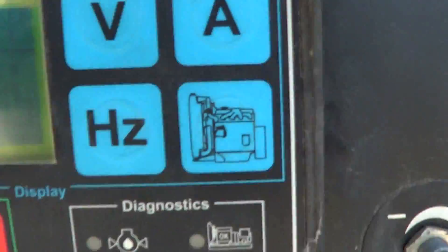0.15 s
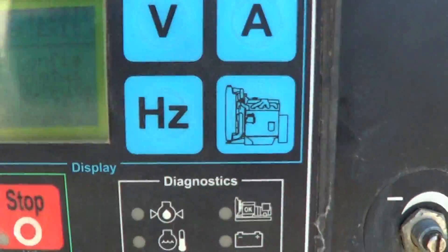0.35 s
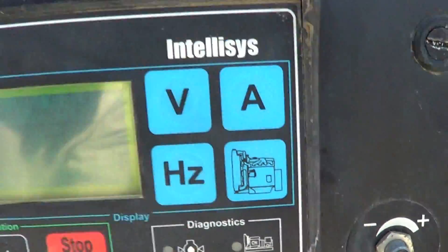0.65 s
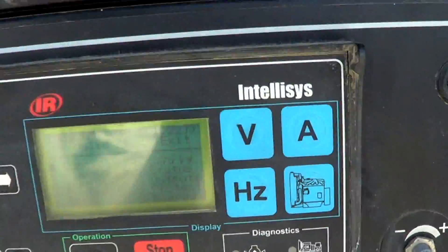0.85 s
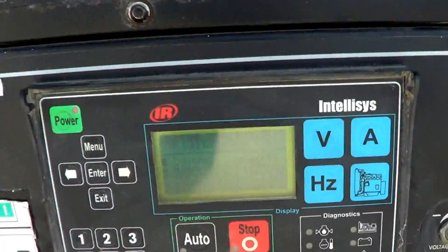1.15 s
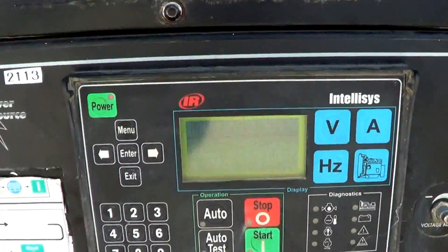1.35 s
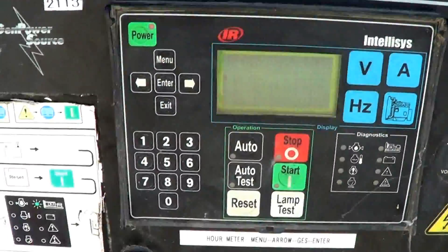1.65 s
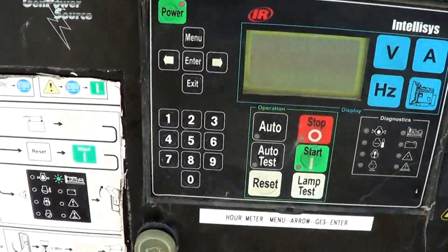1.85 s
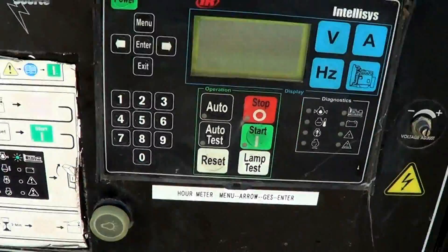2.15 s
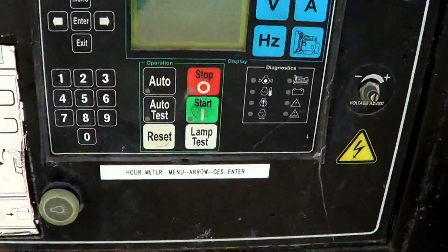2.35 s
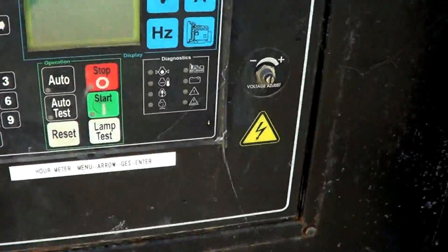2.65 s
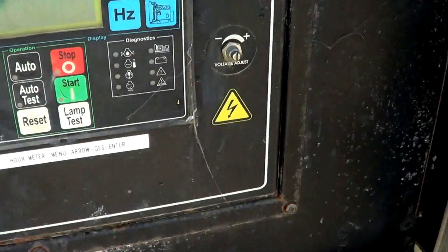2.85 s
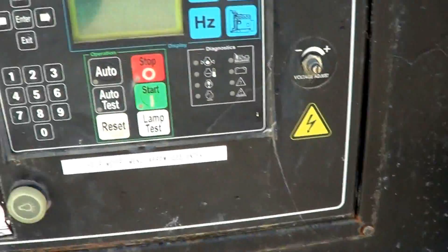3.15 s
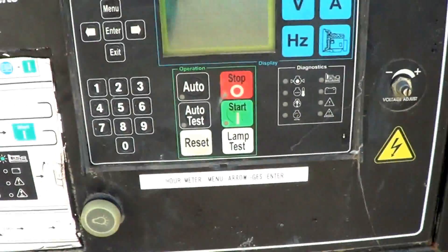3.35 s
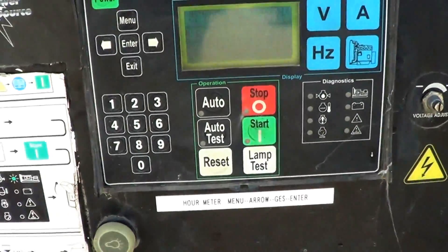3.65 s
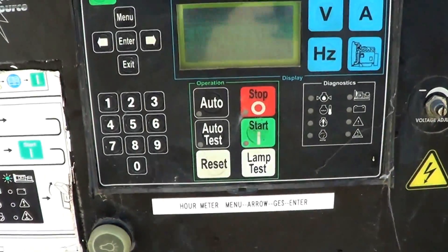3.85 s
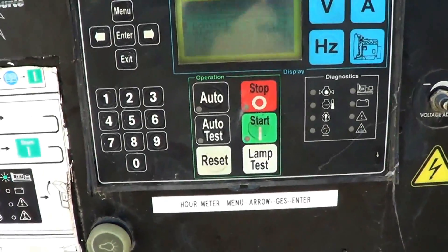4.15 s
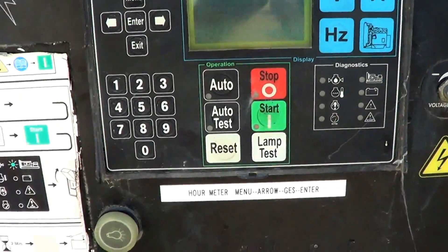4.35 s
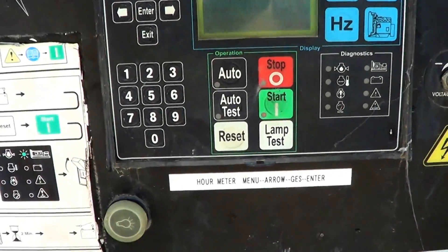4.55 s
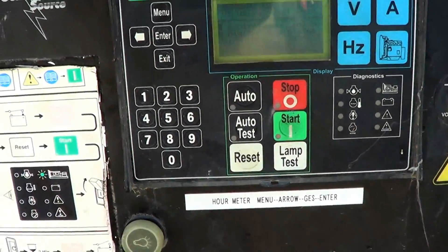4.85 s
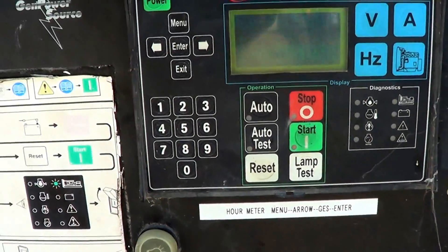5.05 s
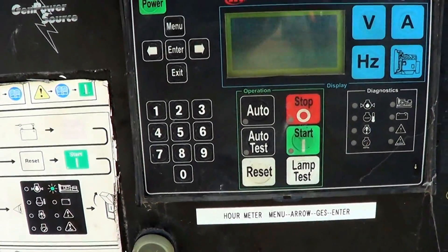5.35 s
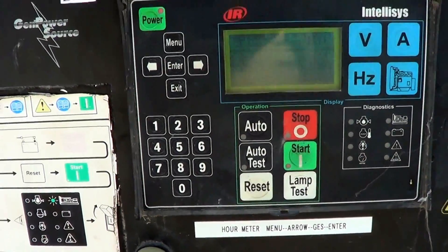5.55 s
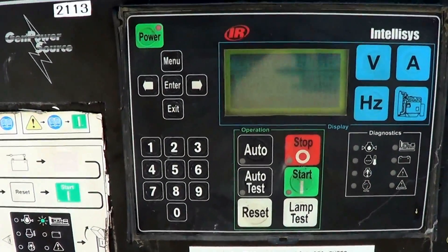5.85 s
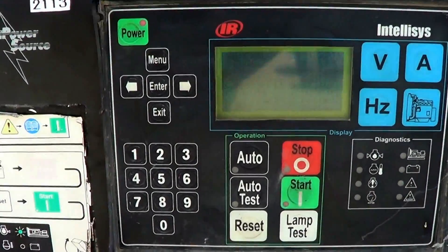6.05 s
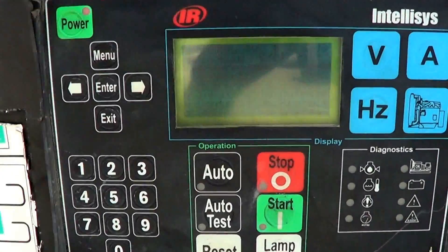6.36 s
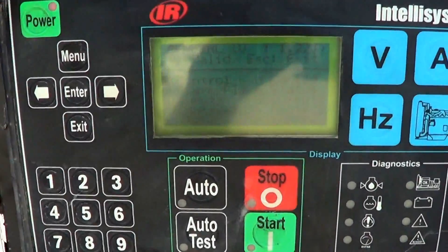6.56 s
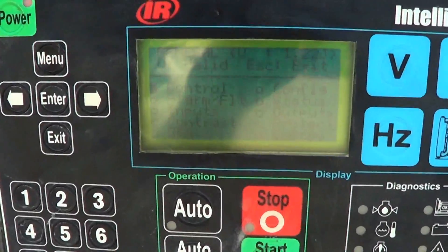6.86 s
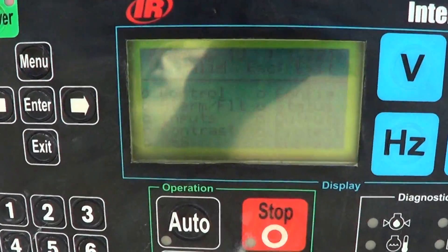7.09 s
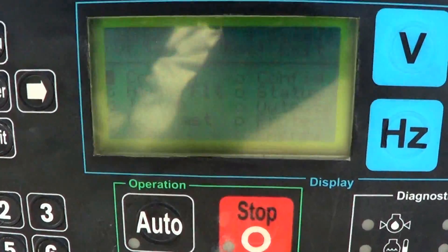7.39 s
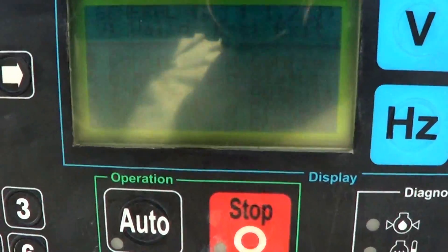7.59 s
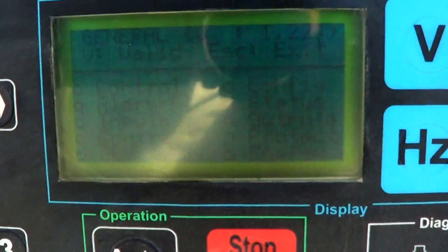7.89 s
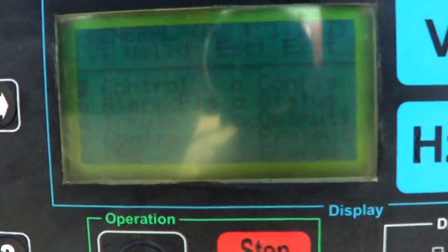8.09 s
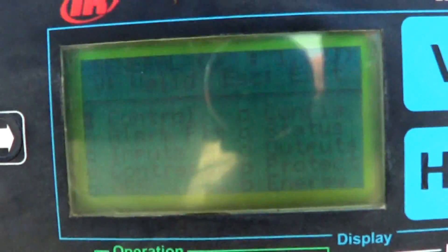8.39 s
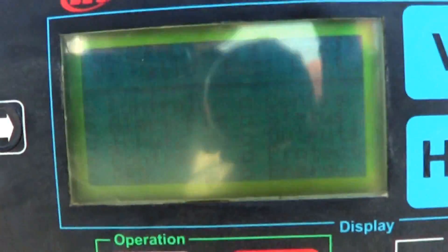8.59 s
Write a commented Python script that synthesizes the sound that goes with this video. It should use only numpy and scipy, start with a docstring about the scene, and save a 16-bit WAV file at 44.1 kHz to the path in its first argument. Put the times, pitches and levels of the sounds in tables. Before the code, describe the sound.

Close, steady diesel generator noise: a low canopy hum, rapid knocking blending into a rough rattle, a fan drone and rushing, hissing air. Knocks come forward slightly early on, a low tone midway, then a thin high ring emerges late. The handheld stereo microphone stays within about arm's length in an open yard, moving nearer at the end as duct air swells. No start, stop or speed change.

```python
"""A four-cylinder diesel generator runs outdoors at about 1846 rpm, heard at arm's length from its panel.
Harmonics of the cycle boom in the canopy, periodic knocks ring the block, the fuel gear ticks in noise bursts;
blade tones drone and filtered noise rushes. The microphone starts close to the panel and is away by 1.2 s. In its
standing waves the knocks swell near 2.3 s, a 169 Hz tone near 4.5 s and a thin 8 kHz ring near 7 s. Close again
from 7.8 s, it hears the duct air swell while tones near 205 and 615 Hz fade towards the end."""
import sys
import numpy as np
from scipy import signal
from scipy.fft import rfft, irfft, next_fast_len
from scipy.io import wavfile

SR = 44100
rng = np.random.default_rng(int(sys.argv[2]) if len(sys.argv) > 2 else 0)


def dump_mix(stems):
    """Bounce the given channels to the path in sys.argv[1] as a 16-bit WAV at rate SR."""
    frames = np.atleast_2d(stems).T  # one column per channel
    limited = np.clip(frames, -1, 1)  # hard clip at full scale
    pcm = np.round(limited * 32767).astype(np.int16)
    wavfile.write(sys.argv[1], SR, pcm)


N = 384904
T = np.arange(N) / SR  # time [s]

# Strong exhaust and canopy tones, before waver and panel: (multiple of the cycle rate [1], level [dB rms])
ENGINE_TONES = [(4, -49.3), (5, -53.6), (7, -38.2), (8, -43.8), (9, -47.3), (10, -39.8), (11, -25.2),
                (13, -34.1), (14, -40.7), (16, -40.8), (18, -43.1), (20, -41.3), (24, -35.2), (25, -39.3),
                (26, -37.1), (30, -40.3), (32, -40.4), (36, -37.9), (39, -41.4), (40, -25.6), (42, -34.8),
                (43, -37.3), (45, -38.1), (46, -38.6), (48, -36.3), (49, -35.2), (50, -40.0), (51, -39.0),
                (53, -39.8), (56, -40.5), (60, -38.5), (64, -37.4), (66, -35.3), (67, -36.9), (69, -39.6),
                (70, -39.8), (78, -39.2), (84, -39.7), (93, -38.2), (96, -39.6), (184, -37.3), (192, -41.2)]
# Ring of block and canopy under the knocks: (frequency [Hz], spectral level [dB per Hz])
BLOCK_RING = [(120, -84), (280, -58), (480, -58), (720, -58), (1040, -56.5), (1110, -57.5), (1350, -57.5),
              (1620, -62.5), (2000, -59.5), (2650, -59), (2920, -56.5), (3350, -66), (6000, -68),
              (15000, -89)]
# Diffuseness of sound arriving from all around: (frequency [Hz], side minus mid [dB])
DIFFUSENESS = [(40, -7), (130, -11), (300, -7.5), (700, -3.5), (2500, -11), (5000, -9), (7300, -6),
               (10000, -11), (13000, -17.5), (15500, -30)]
# Closeness of the microphone to the panel: (time [s], closeness [0-1])
CLOSENESS = [(0, 0.8), (.55, 0.8), (1.2, 0), (6.2, 0.07), (7.2, 0.2), (7.8, 0.86), (8.73, 0.9)]
# Governed four-stroke cycle rate [Hz] at the start, and its slow creep [Hz/s]
CYCLE_HZ, CREEP_HZ_PER_S = 15.379, .0023


def amp(db):
    """Amplitude ratio: 20 dB is a factor of ten in pressure."""
    return 10 ** (np.asarray(db) / 20)


def curves(table):
    """Linear interpolation in time of each column of a table."""
    times, *columns = np.transpose(table)
    return [np.interp(T, times, column) for column in columns]


def swell(db):
    """Relative gain: a level curve taken about its mean."""
    return amp(db - db.mean())


def at(points, hz):
    """Spectral interpolation on a logarithmic frequency axis."""
    f, value = np.transpose(points)
    return np.interp(np.log(hz + 1), np.log(f), value)  # the added 1 Hz keeps the logarithm finite at zero


def shape(x, response):
    """Linear filtering: the spectrum is multiplied by a response given as a function of frequency."""
    size = next_fast_len(N + 4096)
    hz = np.arange(size // 2 + 1) * SR / size
    return irfft(rfft(x, size) * response(hz), size)[..., :N]


def walk(rate):
    """Band-limited chance: a smooth random curve of spread near 1, changing about rate times a second."""
    draws = rng.standard_normal(int(N / SR * rate) + 3)
    knots = signal.resample_poly(draws, up=8, down=1)
    return np.interp(T * rate * 8, np.arange(len(knots)), knots)


def spread(hz):
    """Diffuse field: mid and side weights of a sound scattered by the yard."""
    return np.array([np.ones_like(hz), amp(at(DIFFUSENESS, hz))])


def noise(colour):
    """Coloured noise: white mid and side noise shaped to a spectral density in dB per Hz."""
    white = rng.standard_normal((2, N))
    return shape(white, lambda hz: amp(at(colour, hz)) * np.sqrt(SR / 2) * spread(hz))


def passing(when, half_length, db):
    """Spatial level variation: a smooth rise or dip in dB as the microphone moves through a spot."""
    return db * np.exp(-((T - when) / half_length) ** 2)


def standing(close_db, *spot):
    """Standing wave: gain, of rms 1, of a tone that changes near the panel and passes one node or crest."""
    gain = amp(close_db * curves(CLOSENESS)[0] + passing(*spot))
    return gain / np.sqrt(np.mean(gain ** 2))


def bursts(cycle, blows, rise):
    """Periodic excitation: envelope, of rms 1, of (place, dB, decay) blows with exponential rise and decay."""
    power = 0
    for place, db, decay in blows:
        age = (cycle - place) % 1  # cycles since the blow
        pulse = amp(db) * (1 - np.exp(-age / rise)) * np.exp(-age / decay)
        power = power + pulse ** 2
    return np.sqrt(power / power.mean())


def air(rush_db, hiss_db, flicker_db=0.5, hiss_flicker_db=0.68, top_flicker_db=1.0, split_hz=10500):
    """Flow noise: cooling air rumbles in ducts and hisses out of louvres; the top of the hiss flickers most."""
    # Fan air in the canopy's ducts: (frequency [Hz], spectral level [dB per Hz])
    duct_colour = [(20, -84), (50, -80), (80, -68.5), (100, -58.5), (165, -56), (212, -47.5), (250, -53.5),
                   (345, -59.5), (425, -55.5), (475, -53), (650, -54.5), (1020, -57.5), (1150, -61),
                   (2500, -90)]
    # Air through radiator and louvres: (frequency [Hz], spectral level [dB per Hz])
    louvre_colour = [(700, -72.5), (1500, -61.5), (2000, -60.5), (2850, -61), (3600, -66.5), (4700, -69),
                     (6000, -61.5), (7000, -65.5), (9000, -64.5), (11000, -69.5), (13500, -71.5),
                     (15700, -81)]
    rush = noise(duct_colour) * swell(rush_db) * amp(flicker_db * walk(12))
    hiss = noise(louvre_colour)
    low = shape(hiss, lambda hz: 1 / (1 + (hz / split_hz) ** 8))
    top = hiss - low
    low_hiss = low * swell(hiss_db) * amp(hiss_flicker_db * walk(14))
    return rush + low_hiss + top * amp(top_flicker_db * walk(28))


def fan(cycle, unsteady_db=1.6, drift_db=0.3):
    """Blade-passing tones: harmonics of the belt-driven fan's blade rate, shaken by the uneven inflow."""
    # (multiple of the blade rate [1], level before unsteadiness and panel [dB rms],
    #  change close to the panel [dB], spot passed at [s], half-length [s], change there [dB])
    blade_tones = [(1, -32, 1.2, 8.7, .5, -12), (2, -36.3, 3, 7.1, .7, 7.1), (4, -32.4, -.5, 4.2, .4, 3)]
    blades_per_cycle = 13.325
    blade = blades_per_cycle * cycle + .025 * walk(2) + .01 * walk(14)  # belt slip and flutter
    out = 0
    for order, db, *path in blade_tones:
        drift = drift_db * walk(1.96)
        unsteady = unsteady_db * (0.54 * walk(5.9) + 0.37 * walk(16))
        gain = standing(*path) * amp(db + drift + unsteady)
        out = out + np.sqrt(2) * gain * np.cos(2 * np.pi * (order * blade + rng.random()))
    return out * np.array([[1], [0]])  # mid only


def ticks(cycle, uneven_db=1.05, grain_db=2.0, ring_hz=8020, ring_width_hz=70):
    """Impact and resonance: two bright, gritty fuel-gear ticks in each cycle also keep up a thin ring."""
    # Ticks of the fuel gear: (place in the cycle [0-1], relative strength [dB], decay [cycles])
    gear_blows = [(.155, 2.5, 0.095), (.69, 3.5, 0.19)]
    # Colour of a tick before its path: (frequency [Hz], spectral level [dB per Hz])
    gear_colour = [(2500, -97), (5000, -74), (7200, -67), (8500, -64), (10000, -67), (12000, -74),
                   (15700, -83)]
    # How openly the ticks reach the microphone: (time [s], gain [dB])
    openness = [(0, -4), (.5, -2), (3, -5.5), (5, -1.5), (8.73, -3.5)]
    # Where the ring comes through: (passed at [s], half-length [s], rise there [dB])
    ring_spot = (7.05, .65, 20.6)
    ring_db = -53  # mid level away from its spot, before the envelope [dB rms]
    envelope = bursts(cycle, gear_blows, rise=.003)
    grit = amp(grain_db * walk(1500) + uneven_db * walk(24))
    grit = grit / np.sqrt(np.mean(grit ** 2))
    tick = noise(gear_colour) * grit * amp(curves(openness)[0])
    white = rng.standard_normal((2, N))
    ring = shape(white, lambda hz: spread(hz) / (1 + ((hz - ring_hz) / ring_width_hz) ** 2))
    ring = ring / ring[0].std() * amp(ring_db + passing(*ring_spot))
    return tick * envelope + ring * np.sqrt(envelope)


def firing(cycle, decay=0.54, rise=0.014):
    """Combustion excitation: envelope of four knocks per cycle; rise and decay are in cycles."""
    # The four firings: (place in the cycle [0-1], relative strength [dB])
    cylinders = [(0.128, 5), (0.368, 4), (0.623, 2.5), (0.878, 0)]
    return bursts(cycle, [(place, db, decay) for place, db in cylinders], rise)


def knock_lines(size=8192):
    """Fourier series: mid and side harmonics, of power near 1, of one cycle of knocks."""
    one_cycle = rng.standard_normal((2, size)) * firing(np.arange(size) / size)
    return rfft(one_cycle) / np.sqrt(size)


def knock(cycle, lines, drift=0.59, count=3):
    """Periodic radiation: the block rings alike in every cycle while further paths slowly drift in and out."""
    hz = np.arange(lines.shape[1]) * CYCLE_HZ
    size = 2 * (len(hz) - 1)  # samples of one cycle's waveform
    gain = amp(at(BLOCK_RING, hz)) * np.sqrt(CYCLE_HZ / 2) * size * spread(hz)
    gain[:, [0] + [round(order) for order, _ in ENGINE_TONES]] = 0  # these sound as the hum
    paths = [(lines, np.ones(N))]
    paths += [(knock_lines(), drift * walk(0.457)) for _ in range(count)]
    out, place = 0, cycle % 1 * size
    for path, weight in paths:
        path = path / np.where(hz < 1300, np.abs(path), 1)  # the low harmonics lie evenly
        waves = irfft(path * gain)
        # The first sample follows the last, so that the cycle closes
        played = [np.interp(place, np.arange(size + 1), np.append(wave, wave[0])) for wave in waves]
        out = out + weight * np.array(played)
    return out / np.sqrt(sum(weight ** 2 for _, weight in paths))


def block(cycle, lines, knock_db, scatter_db=-10, uneven_db=2.5, split_hz=1200):
    """Structure-borne sound: repeating knocks plus random scatter; the low end swells with the place."""
    scatter = amp(scatter_db + uneven_db * walk(50)) * firing(cycle) * noise(BLOCK_RING)
    sound = knock(cycle, lines) + scatter
    low = shape(sound, lambda hz: 1 / (1 + (hz / split_hz) ** 6))
    return sound + low * (swell(knock_db) - 1)


def hum(cycle, lines, knock_db, waver_db=1.7, standing_waver_db=0.9, boom_waver_db=0.3, side_db=-4):
    """Harmonic synthesis: engine tones phased by the knocks; the long waves of the exhaust boom waver least."""
    # Tones with a node (-) or crest (+) on the microphone's way: (multiple of the cycle rate [1],
    #  change close to the panel [dB], spot passed at [s], half-length [s], change there [dB])
    nodes_and_crests = [(11, -.8, 4.5, .7, 1.4), (24, 1.2, 0, 2.6, -12.3), (40, -3.4, 8.7, 2, -9.4),
                        (66, -1.4, 1.7, .4, -3.2), (67, -9, 6.3, 1.4, -3.7), (84, .5, .45, .35, 5.5),
                        (184, -9, 7.5, .7, 5.9)]
    out = np.zeros((2, N))
    moving = {order: standing(*path) for order, *path in nodes_and_crests}
    for order, db in ENGINE_TONES:
        hz = order * CYCLE_HZ
        boom, knocking = hz < 190, 600 < hz < 1100
        if boom:
            depth_db = boom_waver_db
        elif order in moving:
            depth_db = standing_waver_db
        else:
            depth_db = waver_db
        waver = amp(walk(0.914) * depth_db)
        gain = amp(db) * waver * moving.get(order, swell(knocking * knock_db))
        phase = 2 * np.pi * order * cycle + np.angle(lines[:, order, None])
        # Boom and standing tones have no side part
        side = amp(at(DIFFUSENESS, hz) + side_db) * (not boom and order not in moving)
        out += np.sqrt(2) * gain * np.cos(phase) * np.array([[1], [side]])
    return out


def panel(sound):
    """Interference: close to the panel its reflection lifts some bands and cancels others."""
    # Effect at full closeness: (frequency [Hz], gain [dB])
    reflection = [(160, -0.5), (230, 0.5), (400, .5), (650, 0), (1150, -1), (1700, 2), (2450, 2),
                  (2850, 0.8), (3350, 3.5), (4300, -0.5), (5700, -2), (8400, 1), (12000, -.5), (14000, 2)]
    reflected = shape(sound, lambda hz: amp(at(reflection, hz)) - 1)
    return sound + curves(CLOSENESS)[0] * reflected


def scene():
    """Superposition: one crankshaft times engine and fan, air noise joins; returns left and right."""
    # Places where one sound comes through more openly: (passed at [s], half-length [s], rise there [dB])
    knock_spot, rush_spot, hiss_spot = (2.3, 1.7, 1.5), (7.7, 1.7, 1.4), (4.8, 1.3, 1.1)
    # The microphone's one swing to the left: (time [s], half-length [s], left minus right [dB])
    swing = (2.8, 0.56, 1.5)
    aim_db = -1.36  # its steady lean to the right, left minus right
    cycle = np.cumsum(CYCLE_HZ + CREEP_HZ_PER_S * T) / SR
    cycle = cycle + 0.00016 * walk(13) + 0.00059 * walk(1.5)  # the governor hunts very slightly
    knock_db = passing(*knock_spot)
    lines = knock_lines()
    engine = hum(cycle, lines, knock_db) + block(cycle, lines, knock_db) + ticks(cycle)
    cooling = fan(cycle) + air(passing(*rush_spot), passing(*hiss_spot))
    mid, side = panel(engine + cooling)
    balance_db = (aim_db + passing(*swing)) * np.array([[1], [-1]]) / 2
    return np.array([mid + side, mid - side]) * amp(balance_db)


def record(dry):
    """Phase-difference stereo: two close ports widen the low end by a phase lead; the top is cut steeply."""
    # Phase by which the left port leads: (frequency [Hz], lead [rad])
    port_lead = [(20, .4), (60, .52), (110, 0.81), (200, 0.8), (400, 0.88), (620, 0.3), (1000, 0),
                 (2800, 0.23), (5500, 0.11), (8000, .02), (15000, 0)]
    # Balance of the ports: (frequency [Hz], left minus right [dB])
    port_balance = [(60, 1.5), (170, 2.3), (400, 0.5), (700, -0.8), (2000, 0.7), (4500, 1.7), (9000, 1)]
    top_hz = 15750
    sign = np.array([[1], [-1]]) / 2

    def port_response(hz):
        """Complex gain: half the balance and half the phase lead, of opposite sign in each port."""
        return amp(sign * at(port_balance, hz)) * (1 + 2j * sign * np.tan(at(port_lead, hz) / 2))

    ports = shape(dry, port_response)
    return signal.sosfilt(signal.ellip(12, .1, 80, top_hz, fs=SR, output="sos"), ports)


dry = scene()
out = record(dry)
dump_mix(out)
```